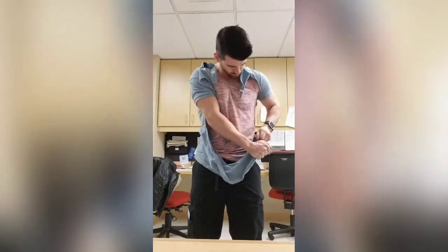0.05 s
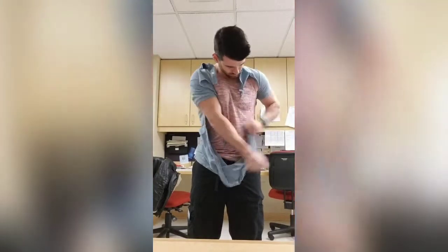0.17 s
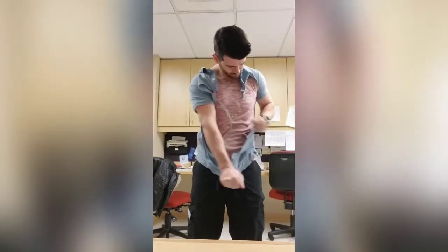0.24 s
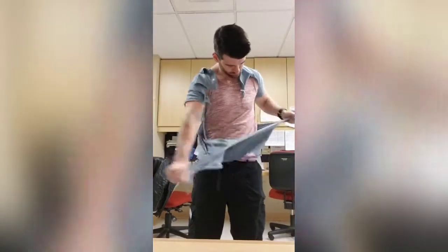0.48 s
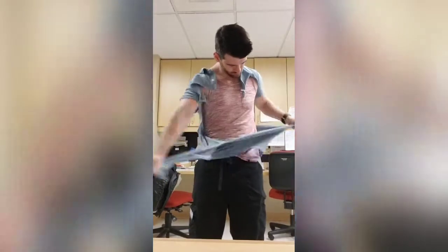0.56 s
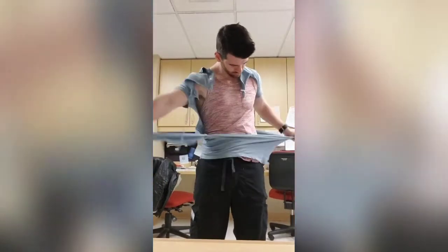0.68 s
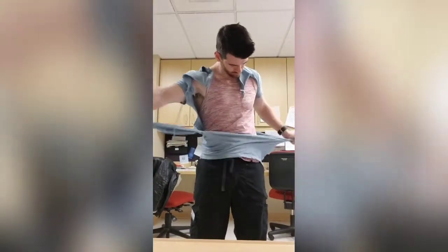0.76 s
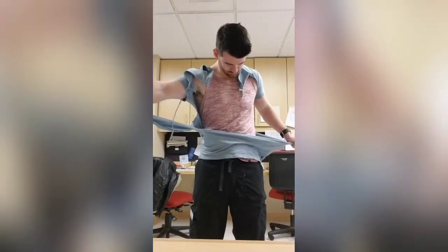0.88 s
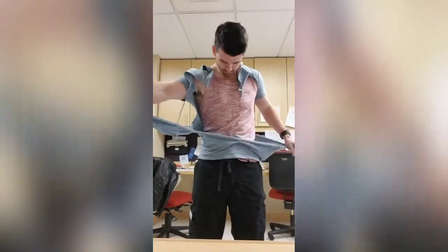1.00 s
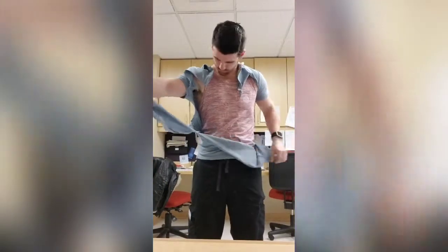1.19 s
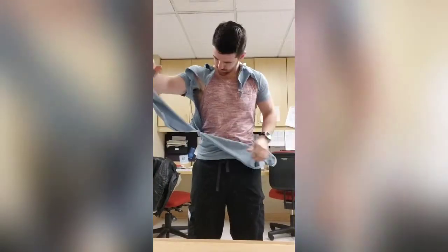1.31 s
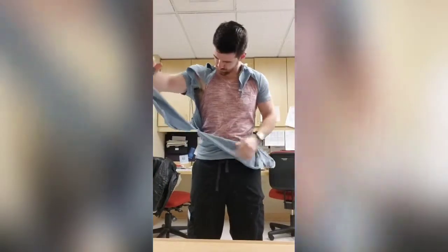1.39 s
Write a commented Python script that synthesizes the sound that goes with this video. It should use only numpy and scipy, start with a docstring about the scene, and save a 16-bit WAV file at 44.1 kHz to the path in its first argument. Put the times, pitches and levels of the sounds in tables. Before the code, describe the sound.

Cloth rips in a quiet office, first with one sharp jerk, then in a longer harsh tear that finishes with snapping threads. The fabric is a short distance from the microphone, louder on the left, over a low ventilation hum.

```python
"""A cotton shirt is torn open in a small office, a couple of metres from a stereo microphone.
A few stitches pop, the seam bursts with one jerk, then a long rip runs across the cloth and ends in
single snaps. Each breaking thread plucks the taut fabric and sheds a crackle of fibres; the stretched
panel shudders and loose cloth rustles. The shirt is louder on the left, with close reflections from
furniture and walls, over a ventilation hum."""
import sys
import numpy as np
from scipy import signal
from scipy.fft import rfft, irfft
from scipy.io import wavfile
from scipy.ndimage import uniform_filter1d

SR = 44100
rng = np.random.default_rng(int(sys.argv[2]) if len(sys.argv) > 2 else 0)


def output_pcm(signal):
    """Save a mono or channel-first signal as 16-bit PCM at the path in sys.argv[1].

    Samples are clipped to [-1, 1] before scaling.
    """
    pcm = np.clip(np.atleast_2d(signal).T, -1, 1) * 32767
    wavfile.write(sys.argv[1], SR, np.round(pcm).astype(np.int16))


N = 63945
T = np.arange(N) / SR

# Room tone: spectrum of the moving air (f/Hz, level/dB). Levels in all tables are relative.
AIR_SPECTRUM = [(20, -13), (60, -6), (150, -10), (200, -16), (250, -21), (300, -19.5), (400, -27),
                (580, -23), (680, -32.5), (1100, -32.5), (1700, -46), (2400, -45.5), (3000, -40.5),
                (3900, -53.5), (6000, -56), (9000, -58), (13000, -64), (16000, -67)]
# Likeness of the air noise in the two channels (f/Hz, correlation)
AIR_COHERENCE = [(30, .97), (130, 0.92), (290, .82), (640, .63), (1400, .03), (16000, 0.036)]
# Duct resonances (f/Hz, width/Hz, level/dB)
DUCT_MODES = [(37.5, 9, -57.5), (81, 9.3, -51), (129.6, 24, -52.5)]
# Balance of the ventilation at the microphone (f/Hz, left minus right/dB)
AIR_BALANCE = [(60, 4.5), (130, 3.5), (290, 7), (640, 7.5), (1400, 16), (3100, 10.5), (6800, -1.5),
               (15000, 5)]
# Reverberation of the office (f/Hz, T60/s)
ROOM_DECAY = [(150, .42), (600, 0.24), (1700, 0.19), (4500, 0.27), (10000, .18), (16000, 0.13)]
# Reflections off nearby furniture and walls (delay/s, relative gain)
REFLECTIONS = [(.0009, 0.098), (.0031, 0.34), (.0066, .35), (.0098, 0.28), (0.0169, .25)]
# Balance of the shirt at the microphone (f/Hz, left minus right/dB)
SHIRT_BALANCE = [(100, 2.5), (300, 6), (1000, 9), (1700, 6), (3000, 8), (4300, 7), (6000, 4), (9500, 0),
                 (11500, -0.5), (13500, 14.5), (16000, -4.5)]
# Loose cloth sliding (t/s, level/dB)
RUSTLE_LEVELS = [(0, -81), (.085, -74.5), (.15, -73), (.85, -73), (1.0, -75.5), (1.15, -76), (1.25, -79),
                 (1.45, -79.5)]
# Shaking of the stretched panel (t/s, level/dB)
FLUTTER_LEVELS = [(0.369, -60), (0.522, -60), (.585, -42), (.64, -39.5), (.69, -45), (.75, -44.5),
                  (.83, -60)]
# Spectrum of that shaking (f/Hz, level/dB)
PANEL_SPECTRUM = [(70, -28), (130, -1), (200, -3.5), (300, -3), (420, -3.5), (650, -11), (1200, -34.5),
                  (16000, -61)]
# Crackle of fibres (f/Hz, level/dB)
FIBRE_SPECTRUM = [(200, -35), (1500, -5.5), (4000, -4.5), (6000, -6), (7600, -2.5), (8700, -7),
                  (10000, 0.5), (11500, 2.5), (13000, -3), (16000, -3.5)]
# Pluck of a strong thread (f/Hz, level/dB)
THREAD_SPECTRUM = [(100, -28), (290, -16.5), (420, 4), (800, -2.5), (1700, 5.5), (2600, -6), (3700, -2.5),
                   (5000, -13), (9000, -24), (16000, -41.5)]
# Pluck of the bursting seam (f/Hz, level/dB)
SEAM_SPECTRUM = [(120, -36.5), (250, -28), (320, -9.5), (390, -0.5), (550, -6.5), (790, 5.5), (1000, 0),
                 (1400, 0), (2300, -3.5), (3700, -12.5), (5500, -20.5), (9000, -31), (16000, -39)]
# Pluck of the taut cloth (f/Hz, level/dB)
CLOTH_SPECTRUM = [(100, -6), (230, -3), (330, -10.5), (430, 4.5), (620, 1.5), (850, -2.5), (1700, -0.5),
                  (3400, -4.5), (5000, -10), (9000, -9.5), (16000, -33)]
# Strong threads snapping singly (t/s, pluck/dB, crackle/dB)
THREAD_SNAPS = [(0.1602, -64, -37.5), (0.1817, -62, -40.5), (0.2104, -28, -18), (.2160, -24.5, -22),
                (.2260, -21.5, -40), (.2348, -21, -20.5), (.347, -41.5, -40.5), (0.5495, -33, -24),
                (0.6636, -51, -28.5), (0.6737, -43, -26), (0.6954, -33, -21), (.727, -32, -36),
                (0.7338, -34.5, -28.5), (.7372, -43, -33), (0.7414, -32.5, -34), (.752, -39, -25.5),
                (.7595, -32, -48), (.763, -30.5, -30), (.772, -32, -36.5), (0.778, -35, -57),
                (.7848, -38, -34), (.794, -39, -52), (0.8139, -34, -38), (0.8166, -41, -40.5),
                (.820, -58, -62)]
# Stitches giving in the straining seam (t/s, pluck/dB, crackle/dB)
SEAM_STRAIN = [(.159, -56, -51.5), (.168, -64.5, -56), (.185, -66, -56), (.206, -59, -52)]
# The jerk that bursts the seam (t/s, pluck/dB, crackle/dB)
SEAM_BURST = [(.2098, -36, -20.5), (.217, -27, -44.5), (.224, -33.5, -49.5), (.234, -23.5, -41),
              (.246, -32.5, -30), (.262, -36.5, -33), (.305, -43.5, -41), (.335, -55.5, -57),
              (.365, -63, -69)]
# The long rip across the cloth (t/s, pluck/dB, crackle/dB)
LONG_RIP = [(.370, -35, -32), (.386, -38, -38.5), (.425, -37.5, -37), (.493, -32, -32.5), (.535, -38, -37),
            (.555, -31, -36), (.577, -32, -30.5), (.615, -37, -35), (.640, -32, -31.5), (.674, -32.5, -42),
            (.690, -58, -72), (.700, -32.5, -30), (.720, -40.5, -38.5), (.757, -36, -53),
            (.785, -41.5, -42), (.805, -55, -54), (.820, -56, -60)]


def amp(db):
    """Decibels to gain."""
    return 10 ** (np.asarray(db) / 20)


def unit_rms(x):
    """Scales to unit rms."""
    return x / np.sqrt(np.mean(x ** 2) + 1e-20)


def at_hz(points, hz):
    """Interpolates a table on a log-frequency axis."""
    f, value = np.transpose(points)
    return np.interp(np.log(hz + 1), np.log(f), value)


def colour(x, spectrum, db_scale=1, unit_energy=True, size=2048):
    """Minimum-phase filter with the given spectrum."""
    hz = abs(np.fft.fftfreq(size, 1 / SR))
    log_gain = np.log(amp(db_scale * at_hz(spectrum, hz)))
    kernel = np.fft.ifft(np.exp(np.conj(signal.hilbert(log_gain)))).real[:size // 2]
    return signal.fftconvolve(x, kernel / (np.linalg.norm(kernel) if unit_energy else 1))[:N]


def steadied(x, span_s=.012):
    """Evens out a signal's power over a short span."""
    span = int(span_s * SR)
    power = signal.fftconvolve(x ** 2, signal.windows.hann(2 * span + 1) / span, "same")
    return x / np.sqrt(abs(power) + np.mean(x ** 2) / 20)


def envelope(times, db):
    """Gain along a level curve, silent outside it."""
    return amp(np.interp(T, times, db)) * (T >= times[0]) * (T <= times[-1])


def ventilation():
    """Room tone: steady air noise and three low duct resonances, stronger on the left."""
    hz = np.fft.rfftfreq(N, 1 / SR)
    left, other = rfft(rng.standard_normal((2, N)))
    coherence, shape = at_hz(AIR_COHERENCE, hz), amp(at_hz(AIR_SPECTRUM, hz))
    right = coherence * left + np.sqrt(1 - coherence ** 2) * other
    air = irfft(np.array([left, right]) * shape, N)
    air *= amp(-60.5) / np.std(irfft(left * shape * (hz > 200), N))  # level set by the hiss, not the bass
    hum = 0
    for f, width, db in DUCT_MODES:
        phases = np.exp(2j * np.pi * rng.random(len(hz)))
        hum += amp(db) * unit_rms(irfft(phases / (1 + (2 * (hz - f) / width) ** 2), N))
    side_db = at_hz(AIR_BALANCE, hz) / 2
    return irfft(rfft(air + hum) * amp([side_db, -side_db]), N)


def room_response(tail_db, echo_db, coherent_hz=750, build_s=.0025, port_lag_s=.00074, delay_spread=.12):
    """Direct sound, first reflections and a short tail at two microphone ports, alike in the bass."""
    size = SR // 2
    t, hz = np.arange(size) / SR, np.fft.rfftfreq(size, 1 / SR)
    left, other = rfft(rng.standard_normal((2, size)))
    coherence = 1 / (1 + (hz / coherent_hz) ** 2)
    right = coherence * left + np.sqrt(1 - coherence ** 2) * other
    f, frame_s, frames = signal.stft(irfft([left, right], size), SR, nperseg=256)
    decay = np.exp(-np.log(1000) * frame_s / at_hz(ROOM_DECAY, f)[:, None])
    tail = signal.istft(frames * decay, SR)[1][:, :size]
    tail *= 1 - np.exp(-(t / build_s) ** 2)
    out = amp(tail_db) * tail / np.linalg.norm(tail[0])
    out[:, 0] += 1  # direct sound
    for delay_s, gain in REFLECTIONS:
        side, shift = rng.uniform(-.8, 1, 2)
        delay_s *= 1 + delay_spread * shift
        out[0, round(delay_s * SR)] += gain * amp(echo_db)
        out[1, abs(round((delay_s + side * port_lag_s) * SR))] += gain * amp(echo_db)
    return out / np.linalg.norm(out[0])


def office(x, tail_db, echo_db, places=5, step_s=.07):
    """The tear travels, so the microphone hears it through one set of reflections after another."""
    out = np.zeros((2, N))
    for place in range(places):
        steps_away = (T / step_s - place + places / 2) % places - places / 2
        crossfade = np.cos(np.pi / 2 * np.minimum(abs(steps_away), 1))
        out += signal.fftconvolve((x * crossfade)[None], room_response(tail_db, echo_db), axes=1)[:, :N]
    return out


def rustle(clicks_per_s=5000):
    """Faint fibre clicks as the loose cloth slides."""
    clicks = rng.standard_normal(N) * (rng.random(N) < clicks_per_s / SR)
    return unit_rms(colour(clicks, FIBRE_SPECTRUM)) * amp(np.interp(T, *np.transpose(RUSTLE_LEVELS)))


def flutter():
    """The low shudder of the stretched panel while the rip runs."""
    shudder = colour(rng.standard_normal(N), PANEL_SPECTRUM)
    return steadied(shudder, span_s=.024) * envelope(*np.transpose(FLUTTER_LEVELS))


def snaps(shake_gain=.74, shake_decay_s=.0032, burst_decay_s=.0007, size=400):
    """Strong threads break singly: each a pluck with a short after-shake and a burst of fibres."""
    plucks, bursts = np.zeros((2, N))
    t = np.arange(size) / SR
    for time_s, pluck_db, crackle_db in THREAD_SNAPS:
        at = round(time_s * SR)
        shake = rng.standard_normal(size) * np.exp(-t / shake_decay_s)
        burst = rng.standard_normal(size) * np.exp(-t / burst_decay_s)
        plucks[at] -= amp(pluck_db)
        plucks[at:at + size] += amp(pluck_db) * shake_gain * shake / np.linalg.norm(shake)
        bursts[at:at + size] += amp(crackle_db) * burst / np.linalg.norm(burst)
    pluck = colour(plucks, THREAD_SPECTRUM) / np.hypot(1, shake_gain)
    crackle = colour(bursts, FIBRE_SPECTRUM)
    return np.sqrt(.003 * SR) * (pluck + crackle)  # each snap holds 3 ms of energy at its level


def fray(breaks, decay_s, clicks_per_s=9000, spread_db=5):
    """Every break sets off a quickly dying shower of tiny clicks."""
    shower = np.sqrt(signal.lfilter([1], [1, -np.exp(-2 / (decay_s * SR))], breaks ** 2))
    signs = rng.choice([-1., 1.], N)
    strengths = amp(spread_db * np.clip(rng.standard_normal(N), -2, 2))
    return shower * signs * strengths * (rng.random(N) < clicks_per_s / SR)


def tear(levels, spectrum, threads_per_s, jitter, spread_db, spurt_depth=.2, spurt_threads=14):
    """Threads give way one after another in uneven spurts; returns cloth pluck and fibre crackle."""
    gap, strength, drift = np.clip(rng.standard_normal((1500, 3)), -2, 2).T
    spurts = spurt_depth * unit_rms(uniform_filter1d(drift, spurt_threads))
    break_s = np.cumsum(np.exp(jitter * gap + spurts)) / threads_per_s
    breaks = np.bincount((break_s * SR).astype(int), amp(spread_db * strength), N)[:N]
    recoil = unit_rms(uniform_filter1d(breaks, size=SR // 100) - breaks)
    scatter = .73 * unit_rms(fray(breaks, decay_s=.00073))  # part of each pluck scatters in the folds
    times, pluck_db, crackle_db = np.transpose(levels)
    pluck = steadied(recoil + scatter) * envelope(times, pluck_db)
    crackle = steadied(fray(breaks, decay_s=.00055)) * envelope(times, crackle_db)
    return np.array([colour(pluck, spectrum), colour(crackle, FIBRE_SPECTRUM)])


def scene():
    """The tearing shirt from a couple of metres away, louder on the left, over the room tone."""
    strain = tear(SEAM_STRAIN, CLOTH_SPECTRUM, threads_per_s=350, jitter=.5, spread_db=-7.5)
    burst = tear(SEAM_BURST, SEAM_SPECTRUM, threads_per_s=520, jitter=.5, spread_db=3)
    rip = tear(LONG_RIP, CLOTH_SPECTRUM, threads_per_s=470, jitter=.45, spread_db=2)
    pluck, crackle = strain + burst + rip
    cloth = office(pluck + flutter(), tail_db=4, echo_db=4)
    fibres = office(crackle + rustle(), tail_db=6.5, echo_db=12)
    threads = office(snaps(), tail_db=3, echo_db=6.5)
    left, right = amp(-3) * (cloth + fibres + threads)
    left = colour(left, SHIRT_BALANCE, db_scale=.5, unit_energy=False)
    right = colour(right, SHIRT_BALANCE, db_scale=-.5, unit_energy=False)
    return np.array([left, right]) + ventilation()


def record(dry):
    """The recorder's band limit, a steep cut near 16 kHz."""
    lowpass = signal.firwin(511, 16050, window=("kaiser", 9), fs=SR)
    return signal.oaconvolve(dry, lowpass[None], "same")


dry = scene()
out = record(dry)
output_pcm(out)
```